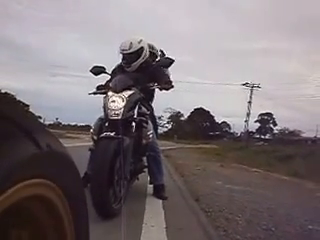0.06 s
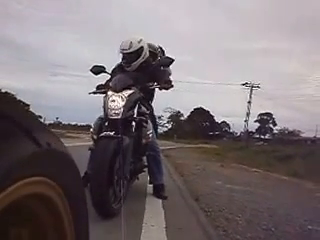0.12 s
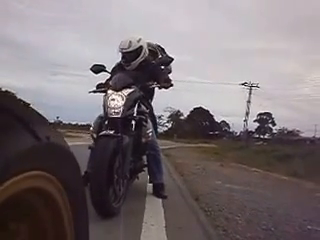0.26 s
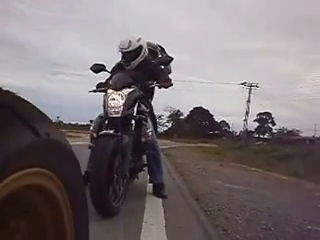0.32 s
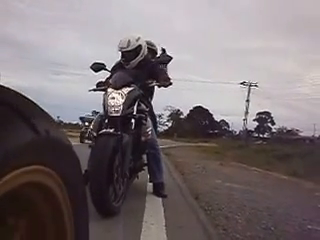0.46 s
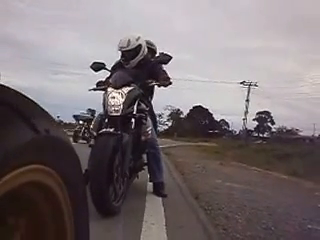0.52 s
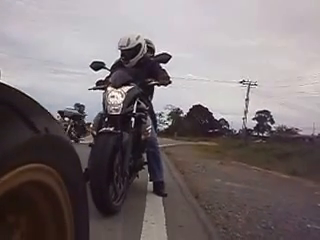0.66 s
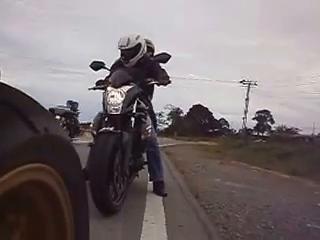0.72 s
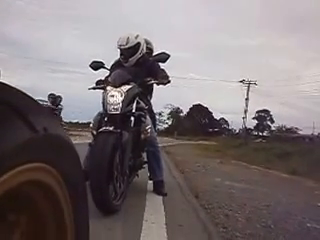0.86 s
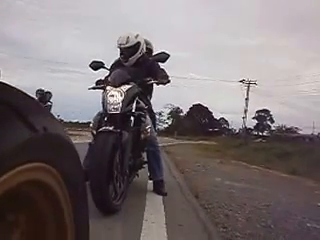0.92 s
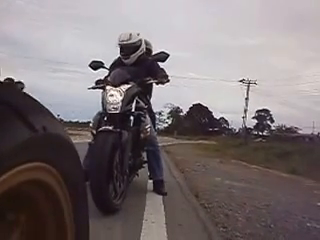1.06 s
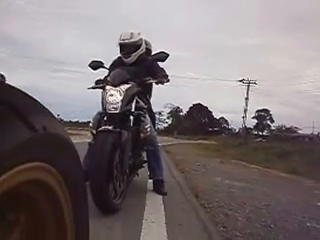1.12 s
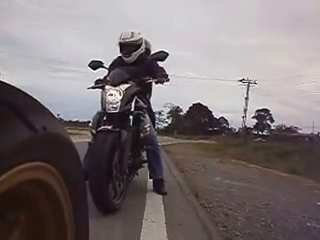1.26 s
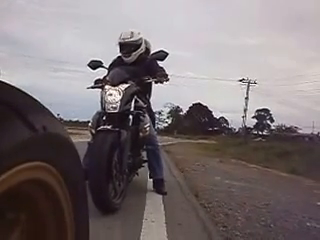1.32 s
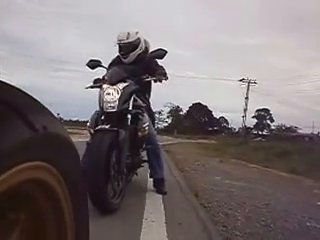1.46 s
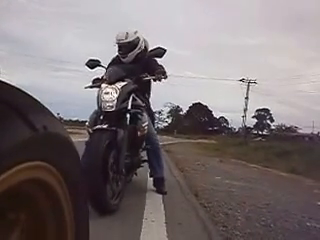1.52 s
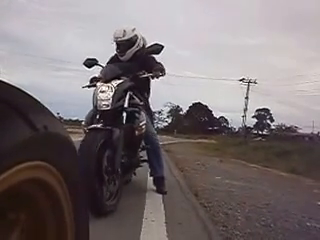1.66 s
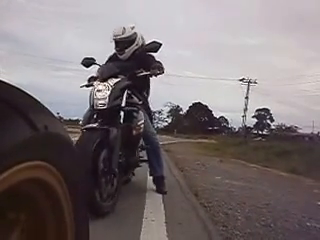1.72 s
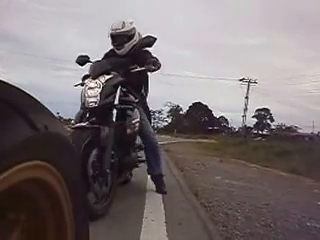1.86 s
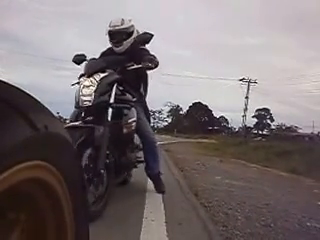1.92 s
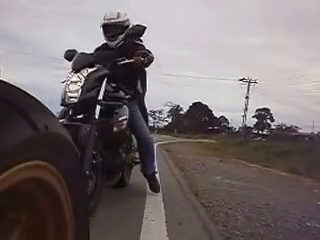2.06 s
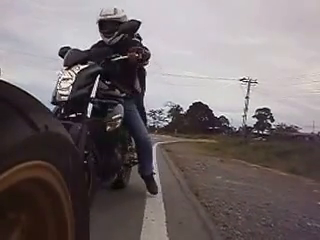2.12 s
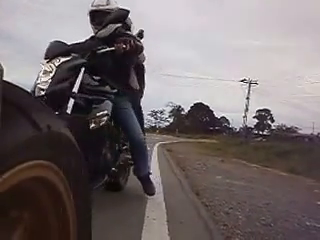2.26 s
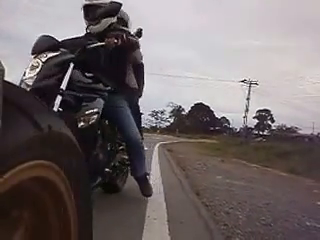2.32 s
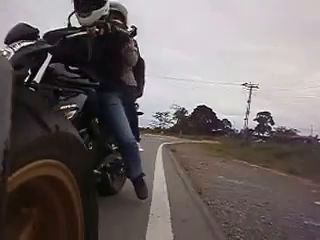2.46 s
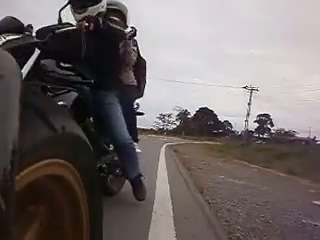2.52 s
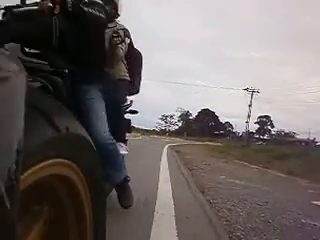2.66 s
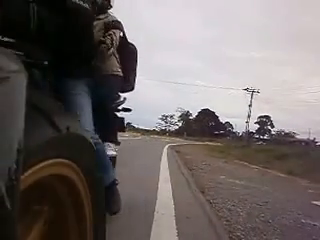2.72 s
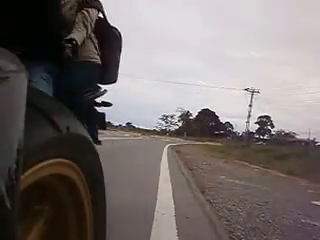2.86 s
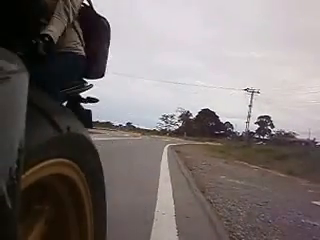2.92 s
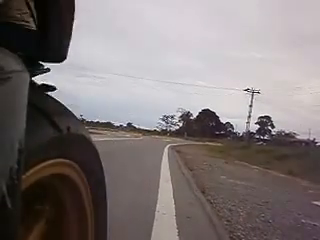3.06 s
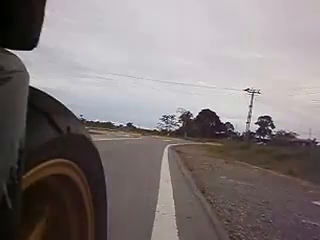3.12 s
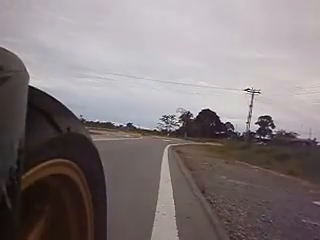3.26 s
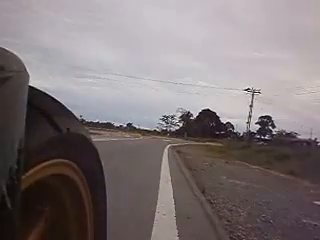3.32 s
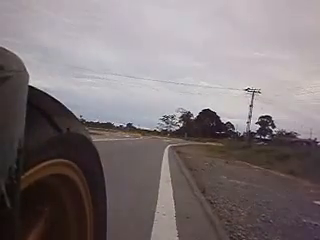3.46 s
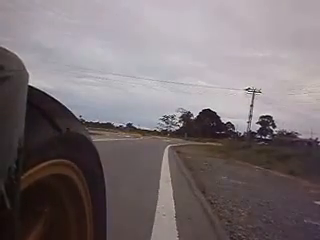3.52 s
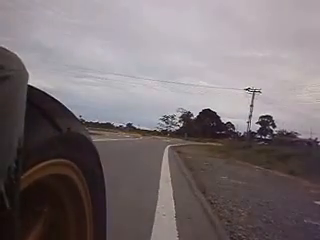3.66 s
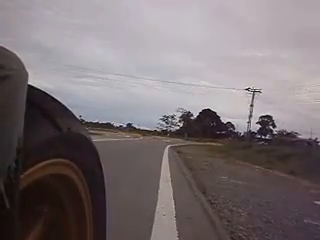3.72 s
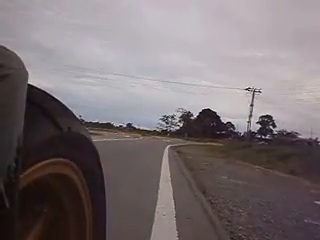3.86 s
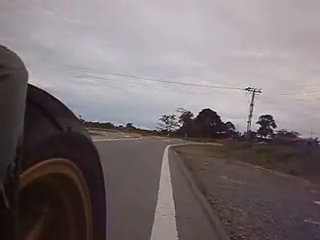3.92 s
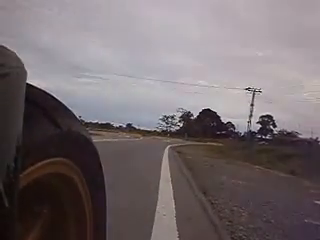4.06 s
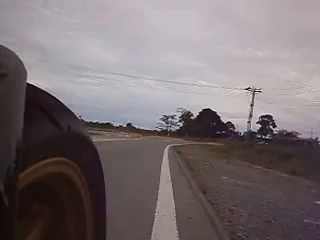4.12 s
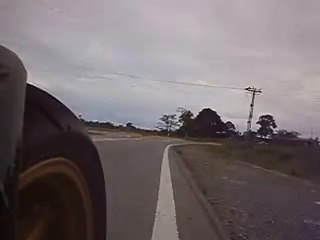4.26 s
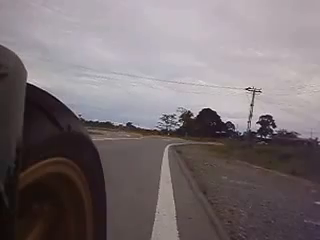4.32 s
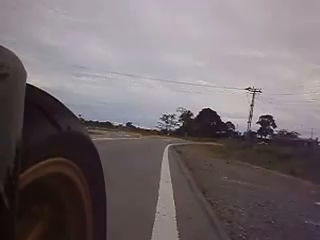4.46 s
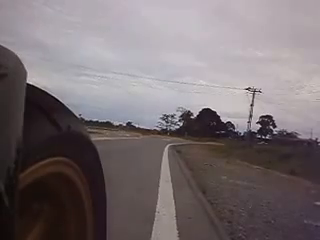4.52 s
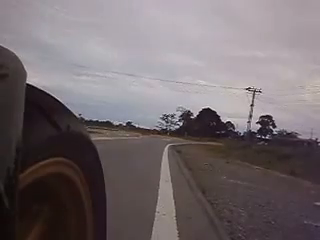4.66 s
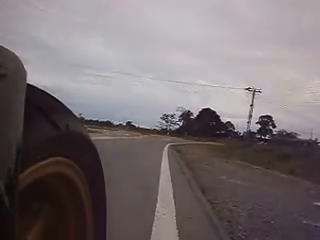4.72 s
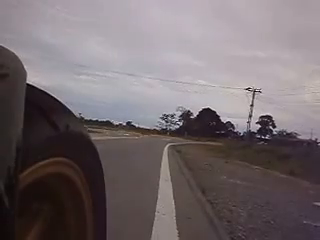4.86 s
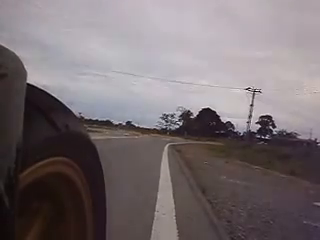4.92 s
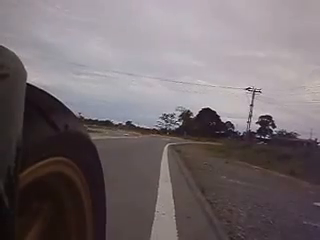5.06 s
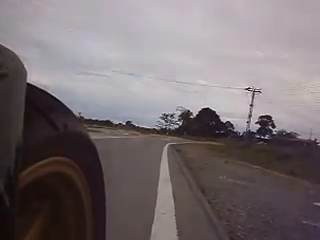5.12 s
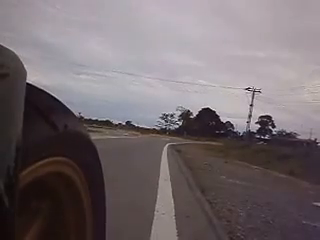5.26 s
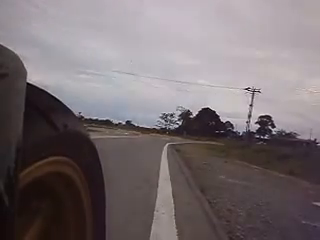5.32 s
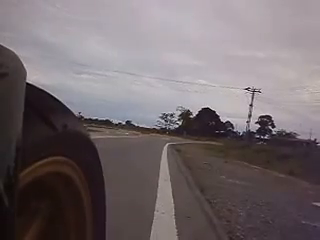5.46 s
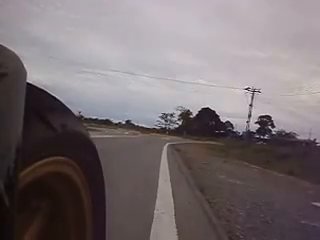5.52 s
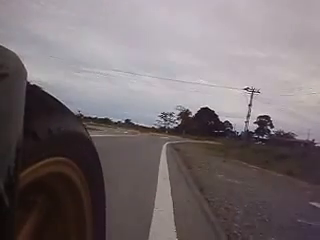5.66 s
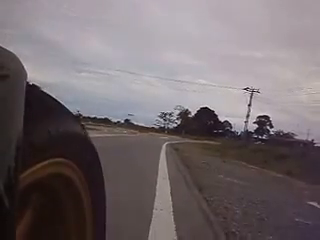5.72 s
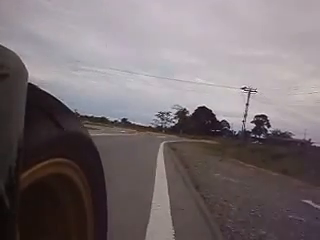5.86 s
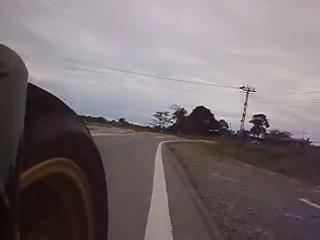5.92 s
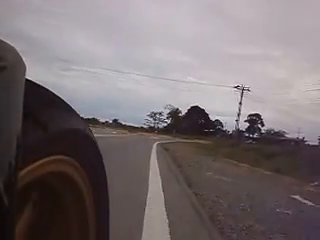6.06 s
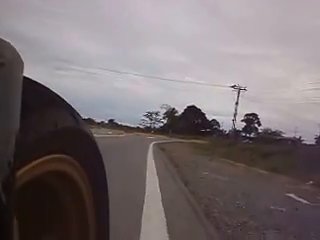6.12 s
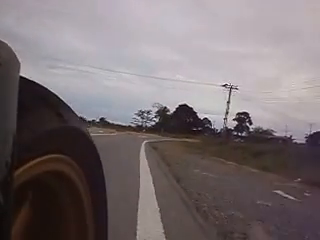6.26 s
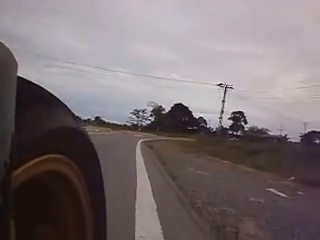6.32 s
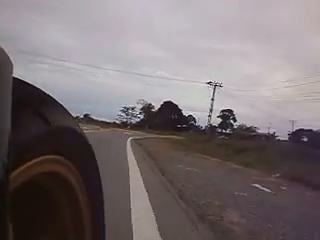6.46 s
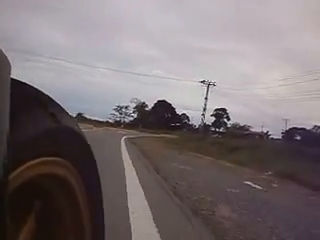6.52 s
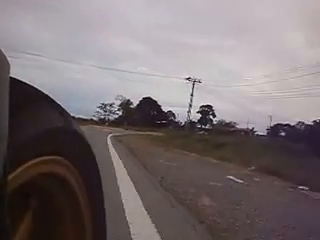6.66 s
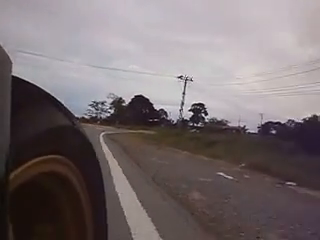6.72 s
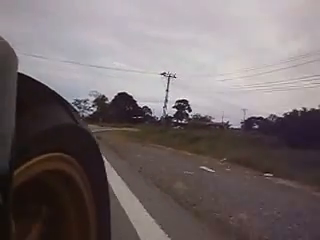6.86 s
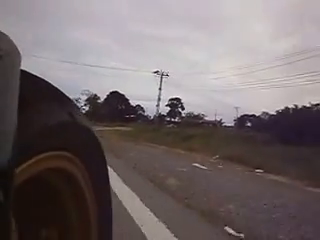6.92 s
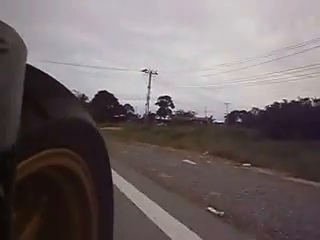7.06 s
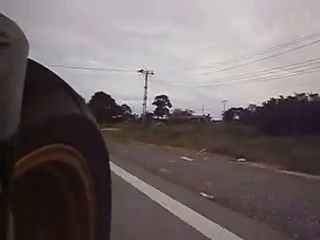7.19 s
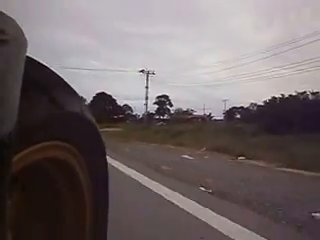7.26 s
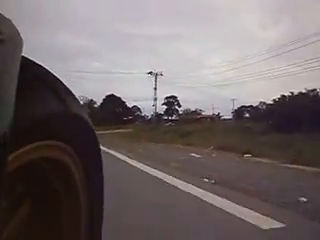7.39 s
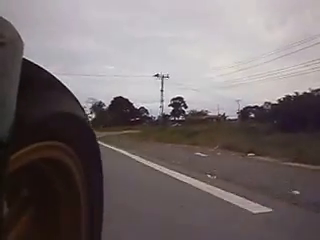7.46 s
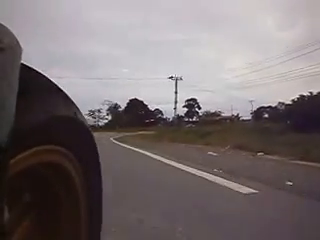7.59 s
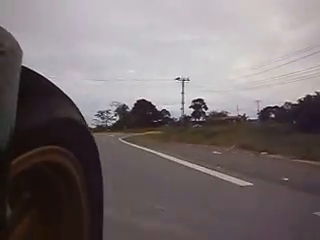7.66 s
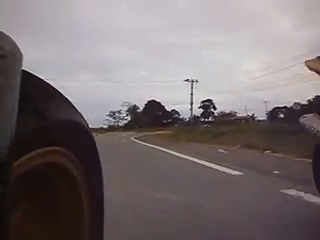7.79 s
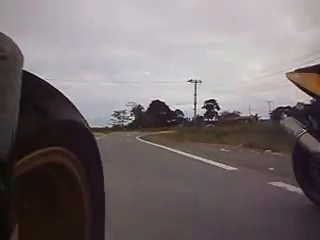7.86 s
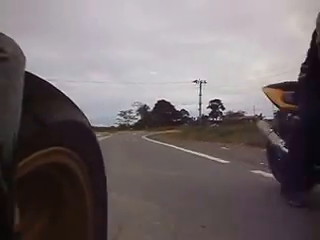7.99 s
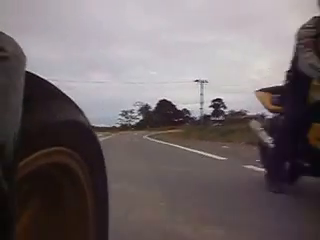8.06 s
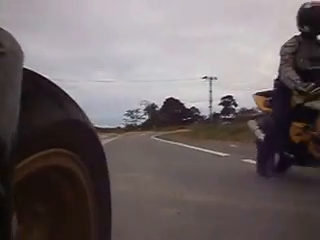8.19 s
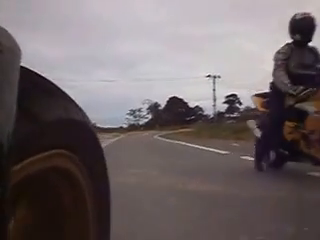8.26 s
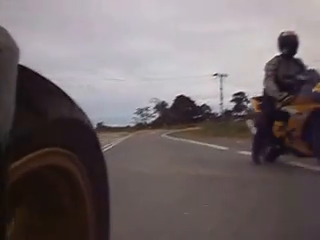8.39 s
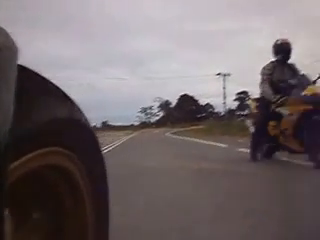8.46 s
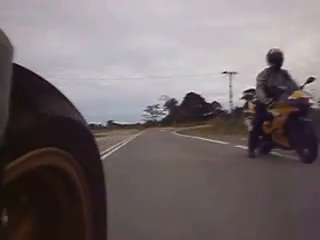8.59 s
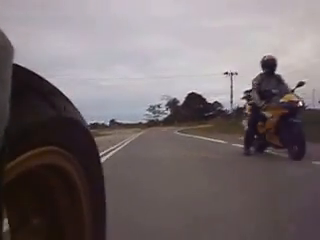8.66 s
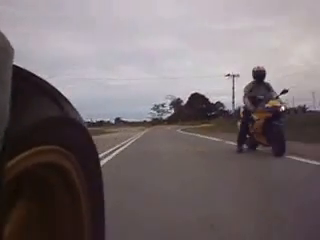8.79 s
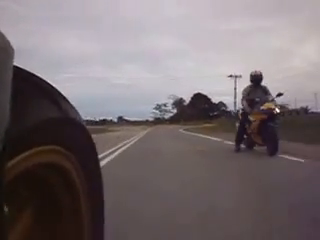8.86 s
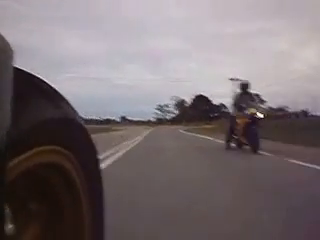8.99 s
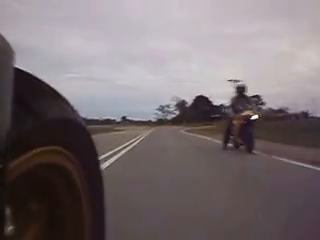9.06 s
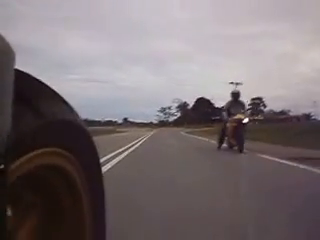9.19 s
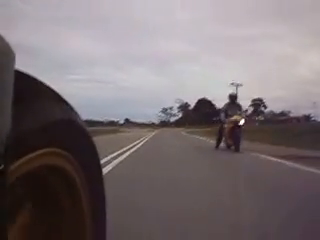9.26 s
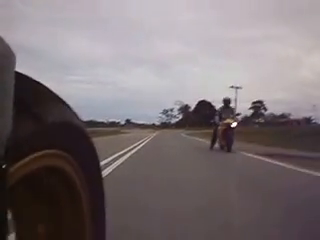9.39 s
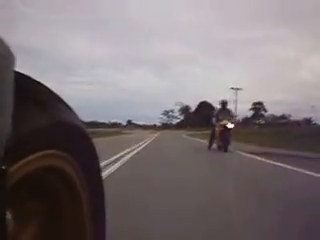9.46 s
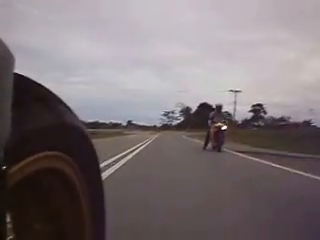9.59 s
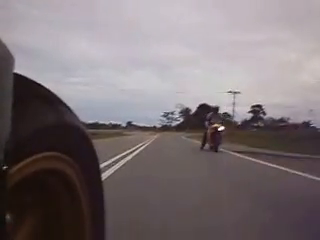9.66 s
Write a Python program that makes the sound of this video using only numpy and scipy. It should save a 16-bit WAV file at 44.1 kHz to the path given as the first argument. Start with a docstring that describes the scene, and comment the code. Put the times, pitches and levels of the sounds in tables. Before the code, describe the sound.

Outdoors at a roadside, a dull, narrow-band microphone sits by a motorcycle's rear wheel. Another bike idles lumpily and rolls past. The starter grinds and squeals, the twin-cylinder engine catches with a thin airy whistle, idles unevenly, is blipped three times, clunks into gear and is blipped again. It pulls away past a third idling bike, rising to a loud, overloaded roar before the throttle shuts.

```python
"""At the roadside, beside a motorcycle's own rear wheel: another bike idles behind it and rolls by.
The twin-cylinder engine is started, whistles, idles, is blipped three times, clunks into gear, is blipped
once more, then pulls away past a third bike until the throttle shuts. Firing impulses excite the exhaust's
resonances; coloured noise makes hiss, rumble and clatter; gliding sines make whine, whistle and engine note.
The exhaust overloads the narrow-band microphone more and more."""
import sys
import numpy as np
from scipy import signal
from scipy.fft import rfft, irfft, next_fast_len
from scipy.io import wavfile
from scipy.ndimage import map_coordinates

SR = 44100
rng = np.random.default_rng(int(sys.argv[2]) if len(sys.argv) > 2 else 0)


def pcm_store(signal):
    """Save signal as 16-bit PCM."""
    levels = np.round(np.clip(np.atleast_2d(signal), -1, 1) * 32767)
    wavfile.write(sys.argv[1], SR, levels.astype(np.int16).T)


N = 428211  # samples


def amp(db):
    """Decibels to an amplitude ratio."""
    return 10 ** (np.asarray(db) / 20)


def unit(x):
    """Normalisation to an rms of 1."""
    return x / np.sqrt(np.mean(x ** 2) + 1e-20)


def curves(rows, at=None):
    """Linear interpolation of each column after the time, at the given times or at every sample."""
    times, *columns = np.transpose(rows)
    at = np.arange(N) / SR if at is None else at
    return [np.interp(at, times, column) for column in columns]


def wobble(rate):
    """Smooth random modulation: a curve through random knots, rate of them a second."""
    knots = rng.standard_normal(int(N * rate / SR) + 4)
    return map_coordinates(knots, [np.arange(N) * rate / SR])


def swell(start, attack, hold, release):
    """Trapezoidal envelope from 0 to 1, fully up at start."""
    since = np.arange(N) / SR - start
    return np.interp(since, [-attack, 0, hold, hold + release], [0, 1, 1, 0])


def filtered(x, response):
    """Linear filtering: the spectrum of x times a response that is a function of frequency."""
    size = next_fast_len(N + SR // 2)
    spectrum = rfft(x, size) * response(np.fft.rfftfreq(size, 1 / SR))
    return irfft(spectrum, size)[:N]


def colour(points):
    """Spectral gain through (f/Hz, level/dB) points on a logarithmic frequency axis."""
    f, db = np.transpose(points)
    return lambda hz: amp(np.interp(np.log(hz + 1), np.log(f), db))


def noise(points):
    """Coloured noise: white noise through a spectral gain, with rms 1."""
    return unit(filtered(rng.standard_normal(N), colour(points)))


def pipe(modes, low_hz, high_hz):
    """Modal superposition: causal resonances between two soft band edges, with unit power gain."""
    def response(f):
        h = sum(amp(db) * 1j * f * width / (centre * centre - f * f + 1j * f * width)
                for centre, width, db in modes)
        h = h * (1j * f / (low_hz + 1j * f)) ** 2 / (1 + 1j * f / high_hz) ** 2
        return -h / np.sqrt(np.mean(np.abs(h) ** 2))
    return response


def impulses(times, sizes):
    """Impulsive excitation, each impulse shared between neighbouring samples to keep its exact time."""
    at = np.clip(times * SR, 0, N)
    i = at.astype(int)
    earlier = np.bincount(i, sizes * (1 - at + i), N + 2)
    later = np.bincount(i + 1, sizes * (at - i), N + 2)
    return (earlier + later)[:N]


def puffs(pulses, life):
    """Turbulent decay: each pulse becomes a dying burst of noise with the same mean energy."""
    t = np.arange(SR // 10) / SR
    shape = np.exp(-t / life) - np.exp(-4 * t / life)
    envelope = signal.fftconvolve(pulses, shape / np.linalg.norm(shape))[:N]
    return envelope * rng.standard_normal(N)


def tone(hz):
    """Frequency modulation: a gliding sine of rms 1, its phase the integral of its frequency."""
    return np.sqrt(2) * np.sin(2 * np.pi * np.cumsum(hz) / SR)


# the microphone's faint hiss: f/Hz, relative level/dB
MIC_HISS_COLOUR = [(200, -14), (700, 3), (1100, 0.5), (2000, -7), (2800, -6.5), (3800, -8), (4600, -33),
                   (8000, -120)]


def microphone_hiss(hiss_db=-43.0):
    """Stationary broadband noise: the microphone's faint steady hiss."""
    return amp(hiss_db) * noise(MIC_HISS_COLOUR)


# wind and tyre rumble, low buffeting and the thud of a bump: f/Hz, relative level/dB
RUMBLE_COLOUR = [(15, -44), (35, -18.5), (55, -12.5), (110, -8.5), (200, -10.5), (500, -26.5),
                 (2000, -52.5), (5000, -120)]
BUFFET_COLOUR = [(12, -8.5), (30, -4.5), (60, -4.5), (150, -26), (600, -72), (2000, -120)]
THUD_COLOUR = [(30, -25), (70, -13.5), (100, -4), (150, -4.5), (260, -6), (500, -29.5), (1500, -120)]
# mean rumble at rest and its growth under way
RUMBLE_DB, MOVING_S, RUMBLE_DB_PER_S = -36, 6.8, 3
# the bump's peak, its level there, and the time constant of its rise and fall
BUMP_S, BUMP_DB, BUMP_LENGTH_S = 7.28, -18, .06


def road(buffet_db=-5):
    """Flow noise: wind and tyres rumble louder as the bike gathers way, with one low bump."""
    t = np.arange(N) / SR
    gust_db = 2.5 * wobble(12)
    moving = np.maximum(t - MOVING_S, 0)
    flow = amp(RUMBLE_DB + RUMBLE_DB_PER_S * moving + gust_db)
    rumble = flow * noise(RUMBLE_COLOUR)
    buffet = amp(buffet_db) * flow * np.minimum(moving, 1) * noise(BUFFET_COLOUR)
    bump = amp(BUMP_DB) * np.exp(-np.abs(t - BUMP_S) / BUMP_LENGTH_S) * noise(THUD_COLOUR)
    return rumble + buffet + bump


# the third bike's engine note, before its random waver: t/s, f/Hz, level/dB
PASSED_NOTE = [(6.7, 355.8, -53), (7.1, 357.4, -24), (7.4, 343.8, -34), (7.65, 298.5, -22.5),
               (7.9, 279, -47.5), (8.3, 274, -63.5)]
# its idle throb: f/Hz, relative level/dB
PASSED_COLOUR = [(15, -60), (35, -25.5), (60, -5), (100, -12), (160, -2), (300, -10.5), (900, -55.5),
                 (2500, -120)]
# nearest moment, throb level there, and time constant of its rise and fall
PASSED_S, PASSED_DB, PASSED_FADE_S = 7.9, -18.5, 0.93


def passed_bike():
    """Passage of a source: a third bike's idle throb swells and fades, and its note sinks in passing."""
    near = np.exp(-np.abs(np.arange(N) / SR - PASSED_S) / PASSED_FADE_S)
    throb = amp(PASSED_DB) * near * noise(PASSED_COLOUR)
    hz, db = curves(PASSED_NOTE)
    note = amp(db + 2 * wobble(23)) * tone(hz * (1 + 0.01 * wobble(40)))
    return throb + note


# the bike behind, which pulls ahead and idles farther off: t/s, relative level/dB
NEIGHBOUR_LEVEL = [(0.0, -18.5), (.8, -17), (1.5, -14.5), (2.2, -23), (2.6, -20.5), (3.3, -39), (5.0, -26),
                   (6.2, -36), (7.5, -65)]
# its exhaust beat: f/Hz, relative level/dB
NEIGHBOUR_PIPE = [(21, -43), (35, -16), (123, 1.5), (188, -6.5), (215, 0.5), (238, -16.5), (257, -7.5),
                  (306, -5.5), (440, -15), (499, -18.5), (518, -45.5), (587, -20.5), (700, -36.5),
                  (910, -70.5), (1540, -120)]
# its mechanical clatter: f/Hz, relative level/dB
NEIGHBOUR_CLATTER = [(290, -43), (500, -22), (531, -18), (576, -16.5), (729, -22.5), (954, -12.5),
                     (2500, -27), (3250, -47), (5500, -120)]


def neighbour(cycle_hz=13.8, scatter_db=2, pipe_db=-1, clatter_db=-29, rattle_db=-31):
    """Periodic excitation: an idling twin's lumpy beat; its clatter swells once, and it fades rolling off."""
    t = np.arange(N) / SR
    level_db, = curves(NEIGHBOUR_LEVEL)
    cycle = np.cumsum(cycle_hz * (1 + .012 * wobble(4.8))) / SR
    strokes = np.arange(int(cycle[-1] * 4))
    # four unequal strokes in each cycle make the lumpiness
    sizes = np.array([0.51, 1.0, 0.25, 1.0])[strokes % 4]
    sizes = sizes * amp(scatter_db * rng.standard_normal(len(strokes)))
    pulses = impulses(np.interp(strokes / 4, cycle, t), sizes)
    rough = .7
    beat = unit(filtered(pulses + rough * puffs(pulses, life=0.07), colour(NEIGHBOUR_PIPE)))
    clatter = noise(NEIGHBOUR_CLATTER) * amp(1.3 * wobble(70))
    rattle = amp(rattle_db) * swell(1.317, attack=0.56, hold=0.18, release=0.27)
    return amp(level_db + pipe_db) * beat + (amp(level_db + clatter_db) + rattle) * clatter


# gearbox and lever knocks: t/s, level/dB, time to fall by 60 dB/s
KNOCKS = [(0.705, -35, 0.13), (4.972, -14.5, 0.13), (5.033, -31, 0.34)]
# their metallic spectrum: f/Hz, relative level/dB
KNOCK_COLOUR = [(150, -46), (500, 6), (1300, -1.0), (2300, -1.5), (3800, 0.5), (5000, -69)]


def knocks():
    """Exponential decay after impact: short metallic clunks from the gearbox and lever."""
    t = np.arange(N) / SR
    level = sum(amp(db - 60 * np.abs(t - s) / t60) * (t >= s) for s, db, t60 in KNOCKS)
    return level * noise(KNOCK_COLOUR)


# the starter's grinding: f/Hz, relative level/dB
STARTER_COLOUR = [(350, -39), (600, -8.5), (738, -14), (981, -7), (1940, 1), (2280, -3), (2520, -5.5),
                  (4000, -10), (5200, -50.5), (8800, -120)]
# the starter cranks, its whine swaying in pitch (SWAY is a fraction of it) with each compression
CRANK_S, CRANK_HOLD_S, CRANK_DB, WHINE_HZ, SWAY, SWAY_HZ = 1.311, 0.196, -24, 1417, 0.078, 8.9
# then it squeals down in pitch and level; FALL is the time constant of the pitch
SQUEAL_S, SQUEAL_DB, SQUEAL_HZ, SQUEAL_FALL_S, SQUEAL_DB_PER_S = 1.582, -16, 1760, .05, 448


def starter(whine_db=-7, upper_db=-8, grind_db=-2, squeal_tone_db=-3):
    """Frequency modulation: the starter grinds and whines, then squeals down in pitch as it drops out."""
    t = np.arange(N) / SR
    cranking = amp(CRANK_DB) * swell(CRANK_S, attack=0.011, hold=CRANK_HOLD_S, release=0.021)
    hz = WHINE_HZ * (1 - SWAY * np.cos(2 * np.pi * SWAY_HZ * (t - CRANK_S)))
    grind = amp(grind_db + 3.4 * wobble(120)) * noise(STARTER_COLOUR)
    whine = amp(whine_db) * tone(hz * (1 + .03 * wobble(200)))
    upper = amp(upper_db) * tone(1.55 * hz * (1 + 0.0253 * wobble(200)))
    since = np.maximum(t - SQUEAL_S, 0)
    dropping = amp(SQUEAL_DB - SQUEAL_DB_PER_S * since)
    dropping = dropping * swell(SQUEAL_S, attack=0.012, hold=.1, release=.02)
    falling_hz = SQUEAL_HZ * np.exp(-since / SQUEAL_FALL_S)
    squeal = amp(squeal_tone_db) * tone(falling_hz * (1 + 0.019 * wobble(200)))
    return cranking * (grind + whine + upper) + dropping * (grind + squeal)


# air drawn past the shut throttle
WHISTLE_S, WHISTLE_RISE_S, WHISTLE_HOLD_S, WHISTLE_FALL_S = 1.73, 0.13, .75, 0.75
# mean pitch at full draught, its fractional sag without draught, level at the start and its decline
WHISTLE_HZ, WHISTLE_SAG, WHISTLE_DB, WHISTLE_FADE_DB_PER_S = 2146, .2, -33, 2.5


def whistle(side_db=-8, side_ratio=0.85, breathy_db=-5):
    """Aeolian tone: the intake whistles in wavering strands, its pitch sagging as the draught weakens."""
    draught = swell(WHISTLE_S, WHISTLE_RISE_S, WHISTLE_HOLD_S, WHISTLE_FALL_S)
    hz = WHISTLE_HZ * (1 - WHISTLE_SAG * (1 - draught) ** 1.6)

    def strand(pitch, waver):
        flicker = amp(2.5 * wobble(50))
        return flicker * tone(pitch * (1 + .004 * wobble(16) + waver * wobble(300)))

    air = strand(hz, 0.012)
    air = air + amp(side_db) * strand(side_ratio * hz, 0.02)
    air = air + amp(breathy_db) * strand(1.06 * hz, 0.054)
    since = np.maximum(np.arange(N) / SR - WHISTLE_S, 0)
    return amp(WHISTLE_DB - WHISTLE_FADE_DB_PER_S * since) * np.sqrt(draught) * air


# throttle blips: first firing t/s, run-up/s, top speed/(cycles/s), start of coasting after the firing/s,
# loss/(cycles/s per s), throttle open/s, closing/s, share of effort in the first firing, effort level/dB
BLIPS = [(3.079, .088, 20.6, .1, 15.8, .065, .19, .55, -15),
         (3.729, .075, 21.3, .09, 18.2, .055, .1, .6, -20.5),
         (4.398, .088, 21.1, .25, 23.8, .11, .05, .66, -17),
         (5.066, .11, 19.8, .37, 16, .12, .08, .15, -17)]
# engine speed while pulling away: t/s, speed/(cycles/s)
PULL_SPEED = [(5.4375, 18.7), (5.6, 25.26), (5.8, 22.33), (6.0, 20.91), (6.2, 20.97), (6.5, 21.82),
              (6.8, 23.1), (7.2, 25.98), (7.4, 29.47), (7.6, 31.1), (7.8, 30.44), (8.3, 38.78),
              (8.7, 45.88), (9.55, 63.2), (9.71, 63.6)]
# the engine catches and settles at idle; rates in four-stroke cycles per second
CATCH_S, SETTLED_S, CATCH_RATE, IDLE_RATE = 1.62, 2.935, 7.73, 12.38
LEAD_S = .033  # speed and effort start to rise this long before the first firing of a blip


def speed():
    """Rotational inertia: cycles/s, as blips spin the flywheel up and friction slows it until the pull."""
    t = np.arange(N) / SR
    rate = np.interp(t, [CATCH_S, SETTLED_S], [CATCH_RATE, IDLE_RATE])
    for s, run_up, top, hang, loss, *_ in BLIPS:
        rising = (top - IDLE_RATE) * np.maximum(s + run_up - t, 0) / (run_up + LEAD_S)
        coasting = loss * np.maximum(t - s - hang, 0)
        rate = np.maximum(rate, top - rising - coasting)
    return np.where(t < PULL_SPEED[0][0], rate, curves(PULL_SPEED)[0])


def cycles(rate):
    """Phase as the integral of rate: cycles since the catch, each throttle opening falling on a firing."""
    t = np.arange(N) / SR
    turned = np.cumsum(rate * (t >= CATCH_S)) / SR
    openings = [CATCH_S] + [blip[0] for blip in BLIPS] + [PULL_SPEED[0][0]]
    there = np.interp(openings, t, turned)
    return turned + np.interp(t, openings, np.round(there) - there)


# effort while pulling away, as the bark's level with the throttle open: t/s, level/dB
PULL_EFFORT = [(5.62, -20.5), (5.88, -24.5), (6.53, -23.5), (7.25, -16), (7.42, -7.5), (7.8, -11.5),
               (8.36, -5), (8.6, -0.5), (9.58, 1)]
# throttle closed: effort at idle, its gain per cycle/s above idle, and the weak strokes before full firing
IDLE_DB, COAST_GAIN_DB_PER_RATE, WEAK_DB, FIRING_S = -40.5, 0.06, -12.5, 2.51
# the low boom: its offset, dB per dB of effort, and gain when the engine lumps along at idle
BOOM_DB, BOOM_FOLLOWS, LUMP_DB = -2.5, 0.42, 3.5
# the boom dips briefly near top speed
BOOM_DIP_S, BOOM_DIP_WIDTH_S, BOOM_DIP_DB = 9.35, 0.12, -12
# the throttle shuts at the end of the pull, changing the bark and the boom
SHUT_S, SHUT_TAKES_S, OVERRUN_DB, OVERRUN_BOOM_DB = 9.602, .022, -14.5, 2.5


def load(rate):
    """Source strength under load: levels/dB of the exhaust's boom and bark, both following the throttle."""
    t = np.arange(N) / SR
    weak = WEAK_DB * np.clip((FIRING_S - t) / 0.24, 0, 1)
    effort = IDLE_DB + COAST_GAIN_DB_PER_RATE * (rate - IDLE_RATE) + weak
    for s, *_, held, closing, first, db in BLIPS:
        throttle = np.interp(t - s, [-LEAD_S, 0, held, held + closing], [0, first, 1, 0])
        effort = effort + (db - effort) * throttle
    effort = np.where(t < PULL_SPEED[0][0] - LEAD_S, effort, curves(PULL_EFFORT)[0])
    shut = np.clip((t - SHUT_S) / SHUT_TAKES_S, 0, 1)
    lump = LUMP_DB * np.clip((17 - rate) / 5, 0, 1) * (t > FIRING_S)
    dip = BOOM_DIP_DB * np.exp(-((t - BOOM_DIP_S) / BOOM_DIP_WIDTH_S) ** 2)
    boom_level = BOOM_DB + BOOM_FOLLOWS * effort + lump + dip + OVERRUN_BOOM_DB * shut
    bark_level = effort + OVERRUN_DB * shut
    return boom_level, bark_level


# whirr of chains and tappets: f/Hz, relative level/dB
GEAR_COLOUR = [(240, -39.5), (400, -8), (544, 5.5), (611, -8.5), (1070, -10), (1330, -8.5), (1870, -11.5),
               (2220, -9), (2540, -22.5), (3740, -18), (4000, -17), (5200, -83), (8800, -120)]
# hiss of the intake around the start: f/Hz, relative level/dB
INTAKE_HISS = [(250, -36), (450, -2.5), (700, -3), (1300, -0.5), (1900, -4.5), (2300, 0), (2600, -8),
               (3700, -6), (5000, -56), (8000, -120)]


def valve_gear(bark_level, idle_db=-38.5, follows=0.16, intake_db=-31.5, flutter_db=1.63):
    """Amplitude-modulated noise: chains and tappets whirr louder under load; the intake hisses at first."""
    running = np.arange(N) / SR > CRANK_S
    whirr = running * amp(idle_db + follows * (bark_level - IDLE_DB)) * noise(GEAR_COLOUR)
    drawing = swell(CATCH_S, attack=0.25, hold=1.42, release=0.21)
    hiss = amp(intake_db) * drawing * noise(INTAKE_HISS)
    return (whirr + hiss) * amp(flutter_db * wobble(90))


# silencer resonances, cool: f/Hz, width/Hz, relative level/dB
SILENCER_MODES = [(108.4, 51, -2), (196, 57, 3.5), (240, 18, -9.5)]
SILENCER_HZ = 380  # the silencer passes only the slow part of each pulse
# header pipe resonances, with one broad hump beneath them: f/Hz, width/Hz, relative level/dB
HEADER_MODES = [(509.2, 67, 3.5), (652, 90, 4.5), (739.6, 26, -1), (830, 290, -2), (934, 49, -9.5),
                (1263, 87, -3.5), (1504, 160, -5)]
# collector box between headers and silencer: f/Hz, width/Hz, relative level/dB
COLLECTOR_MODES = [(378, 60, 0)]
# a duct that howls at high revs: f/Hz, width/Hz, relative level/dB
HOWL_MODES = [(692, 70, 2.5), (1202, 37, -2.5), (1276, 110, 3.5)]
# sharp crack of the pulse front: f/Hz, width/Hz, relative level/dB
CRACK_MODES = [(2020, 1800, 1), (3300, 4700, -7.5)]
# gas hiss at the pipe's mouth: f/Hz, relative level/dB
RASP_COLOUR = [(600, -35.5), (1400, 8), (1900, -3), (2500, -3.5), (3400, 3.5), (4200, -15.5), (6000, -35.5)]


def exhaust(rate, boom_level, bark_level, second_boom_db=-2, second_bark_db=-1, idle_scatter_db=4.5,
            idle_lag=0.022, rasp_db=-14, crack_db=-15.0, howl_db=-2, cycle_db=-13, crank_db=-10,
            hot_ratios=(1.36, 1.2, 1.2), collector_db=-7, collector_hot_db=-9, front_lag=0.00129):
    """Impulse-excited resonance: two cylinders fire about a quarter cycle apart, unevenly at idle, then rest."""
    t = np.arange(N) / SR
    revs = np.clip((rate - 28) / 28, 0, 1)
    idling = np.clip((21 - rate) / 5, .04, 1)
    heat = np.clip((rate - 24) / 9, 0, 1)  # of the gas, rising with engine speed

    # firing times of the first, then of the second cylinder
    cycle = cycles(rate)
    whole = np.arange(int(cycle[-1]) + 1)
    lazy = np.interp(whole, cycle, idling)
    chance = rng.standard_normal((len(whole), 5)).T
    second = whole + .24 + lazy * (idle_lag + .02 * chance[0])
    times = np.interp(np.concatenate([whole, second]), cycle, t)
    times = np.maximum(times, CATCH_S)

    # pulse sizes: slower firing gets larger pulses, to keep the power
    boom_db, bark_db = np.interp(times, t, boom_level), np.interp(times, t, bark_level)
    share = np.sqrt(SR / np.interp(times, t, rate) / 2)
    scatter_db = idle_scatter_db * np.tile(lazy, 2) * chance[1:3].ravel()
    boom_db = boom_db - 3.48 + scatter_db + np.repeat([0, second_boom_db], len(whole))
    bark_db = bark_db + scatter_db + 1.4 * chance[3:5].ravel()
    bark_db = bark_db + np.repeat([0, second_bark_db], len(whole))
    boom = impulses(times, share * amp(boom_db))
    # the steep front follows the first slow swing
    bark = impulses(times + front_lag, share * amp(bark_db))

    # hotter gas raises the silencer's resonances
    hot_modes = [(hz * ratio, width, db) for (hz, width, db), ratio in zip(SILENCER_MODES, hot_ratios)]
    body = filtered(boom * (1 - heat), pipe(SILENCER_MODES, low_hz=29.2, high_hz=SILENCER_HZ))
    body = body + filtered(boom * heat, pipe(hot_modes, low_hz=31, high_hz=SILENCER_HZ))

    # each front, opposite in sign to the swing, trails turbulence, most of all at idle
    turbulence = .3 + .65 * idling - .25 * heat
    gas = turbulence * puffs(bark, life=0.0097) - bark
    edge = filtered(gas, pipe(HEADER_MODES, low_hz=111, high_hz=2010))
    collector_gain = amp(collector_db + collector_hot_db * heat)
    collector = collector_gain * filtered(-gas, pipe(COLLECTOR_MODES, low_hz=99, high_hz=1550))
    howl_gain = amp(howl_db) * heat * (0.4 + 0.55 * revs)
    howl = howl_gain * filtered(gas, pipe(HOWL_MODES, low_hz=710, high_hz=2090))
    crack = amp(crack_db) * filtered(gas, pipe(CRACK_MODES, low_hz=895, high_hz=4830))
    rasp = filtered(puffs(bark, life=0.0069), lambda f: unit(colour(RASP_COLOUR)(f)))
    hiss = amp(rasp_db - 2 * revs) * rasp

    # at high revs the cycle and the crank turn are heard as low notes
    turn = 2 * np.pi * cycle
    low_notes = amp(cycle_db) * np.sin(turn) + amp(crank_db) * np.sin(2 * turn)
    throb = revs * amp(bark_level) * low_notes
    return body + edge + collector + howl + crack + hiss + throb


def scene():
    """Superposition: speed and throttle drive the exhaust and valve gear; the rest sounds around them."""
    rate = speed()
    boom_level, bark_level = load(rate)
    surroundings = microphone_hiss() + road() + passed_bike() + neighbour()
    engine = knocks() + starter() + whistle() + valve_gear(bark_level)
    engine = engine + exhaust(rate, boom_level, bark_level)
    return (surroundings + engine)[None]


def clipped(x, top, hardness):
    """Saturation: peaks flatten against a ceiling."""
    return x / (1 + np.abs(x / top) ** hardness) ** (1 / hardness)


MIC_HZ, TOP_HZ = 4080, 16200  # upper band edges of the microphone and of the final output


def record(dry):
    """Overload and band limiting: the input saturates, the treble is cut, and overshoots clip once more."""
    overloaded = clipped(dry[0], top=.72, hardness=8)
    narrow = filtered(overloaded, lambda hz: 1 / np.sqrt(1 + np.minimum(hz / MIC_HZ, 2) ** 120))
    ceiling = .69
    return filtered(np.clip(narrow, -ceiling, ceiling), lambda hz: hz < TOP_HZ)[None]


dry = scene()
out = record(dry)
pcm_store(out)
```